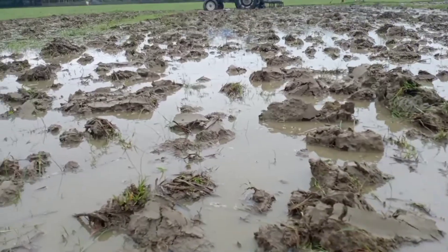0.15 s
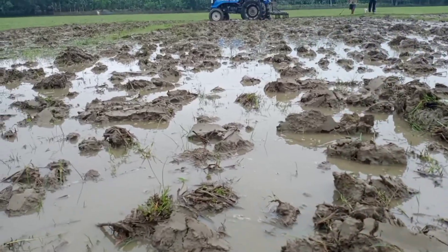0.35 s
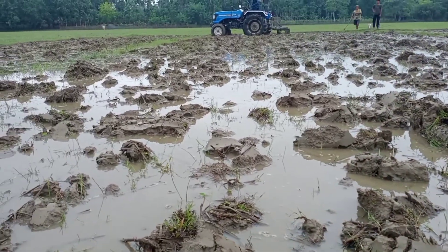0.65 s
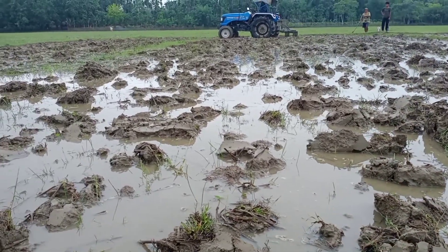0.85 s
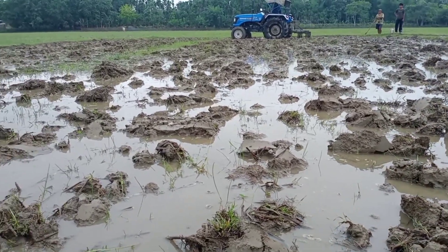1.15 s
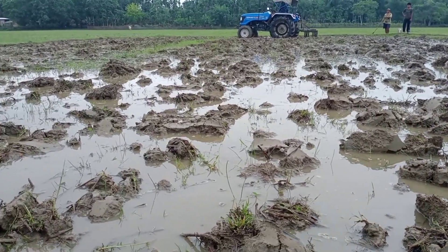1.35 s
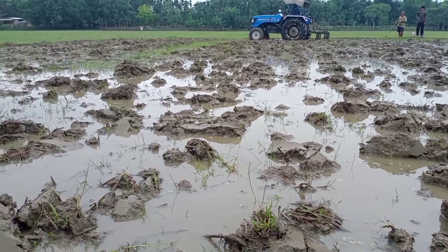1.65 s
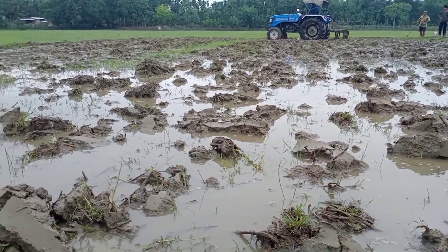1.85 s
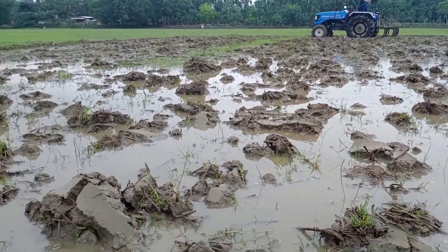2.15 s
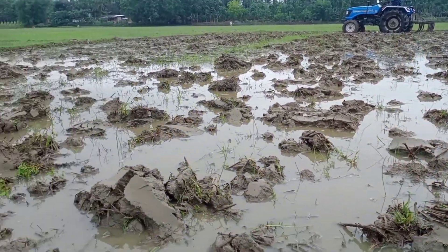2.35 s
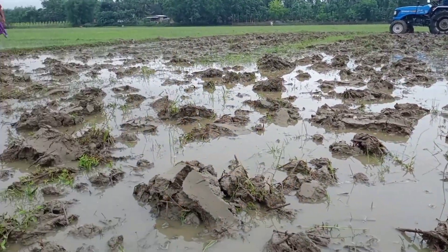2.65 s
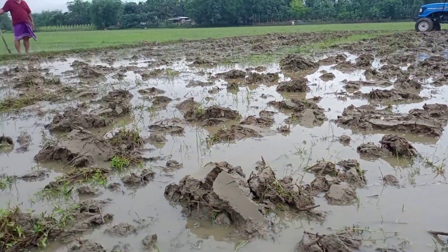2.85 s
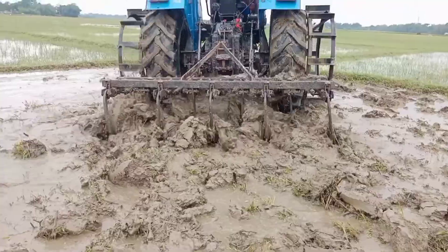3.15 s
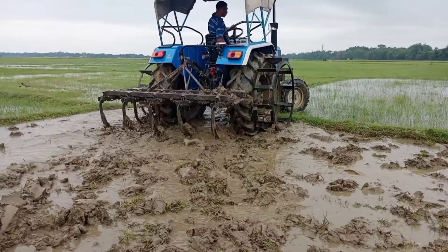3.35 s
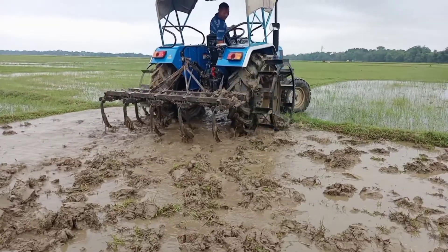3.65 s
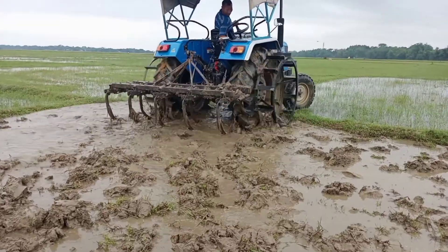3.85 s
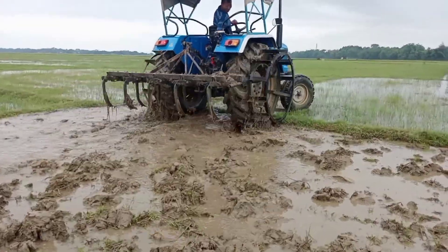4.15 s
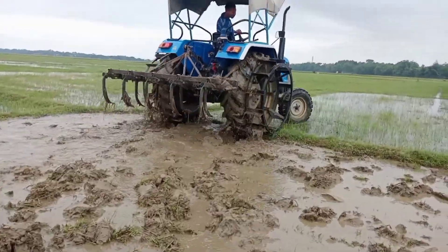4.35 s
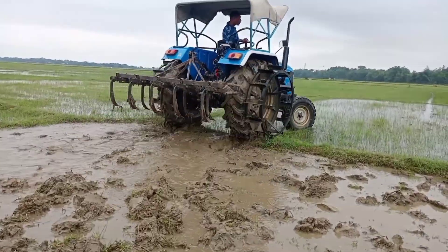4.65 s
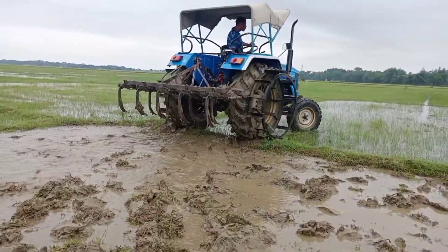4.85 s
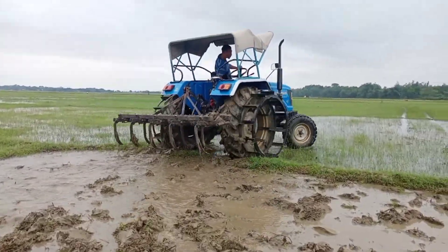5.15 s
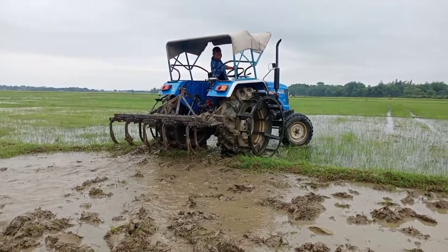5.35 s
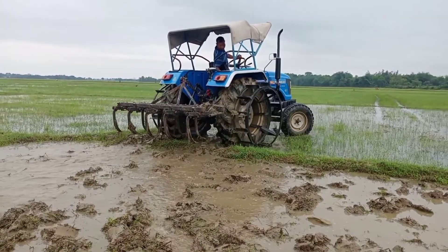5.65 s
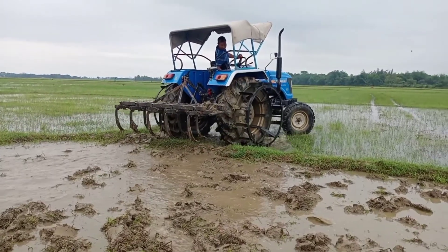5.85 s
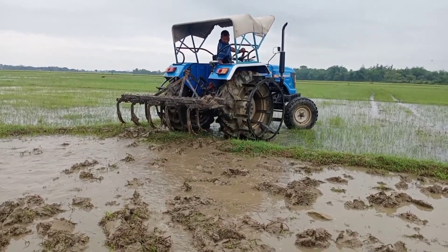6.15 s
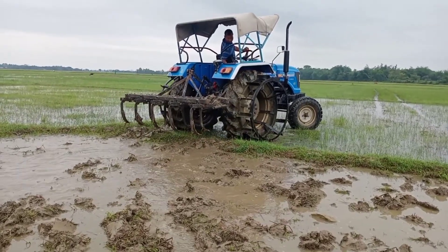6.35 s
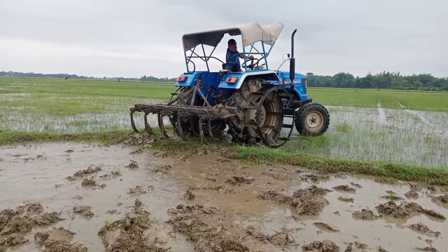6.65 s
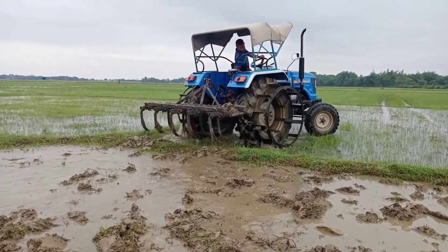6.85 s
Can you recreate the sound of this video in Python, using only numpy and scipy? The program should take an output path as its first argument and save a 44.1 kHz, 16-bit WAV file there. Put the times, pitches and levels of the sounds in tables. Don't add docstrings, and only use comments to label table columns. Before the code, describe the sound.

Outdoors on a flooded field, a diesel tractor putters far off with a dull, steady rattle and faint hiss. The sound stops dead for a moment, then returns a few metres away, louder and deeper. The engine labours hard, eases, and surges again at the end, with metal clanks, short water splashes and heavy wind thumping the unprotected microphone.

```python
import sys
import numpy as np
from scipy import signal
from scipy.fft import rfft, irfft
from scipy.io import wavfile
from scipy.ndimage import uniform_filter1d, map_coordinates

SR = 44100
rng = np.random.default_rng(int(sys.argv[2]) if len(sys.argv) > 2 else 0)


def generate_wav(sig):
    pcm = np.round(np.clip(np.atleast_2d(sig).T, -1, 1) * 32767).astype(np.int16)
    wavfile.write(sys.argv[1], SR, pcm)


def volts_from_db(level):
    exponent = np.asarray(level, float) / 20
    return 10 ** exponent


N = 308700
t = np.arange(N) / SR
NEAR_START_S = 3.159
far = t < NEAR_START_S


def level(x, db):
    return x * volts_from_db(db) / np.sqrt(np.mean(x ** 2))


def colour(x, table):
    hz, db = np.transpose(table)
    bins_hz = np.arange(2049) * SR / 4096 + 1
    log_gain = np.interp(np.log(bins_hz), np.log(hz), db) * np.log(10) / 20
    cepstrum = irfft(log_gain)
    cepstrum[1:2048] *= 2
    cepstrum[2049:] = 0
    response = irfft(np.exp(rfft(cepstrum)))
    return signal.fftconvolve(x, response)[:N]


def by_distance(x, far_colour, near_colour):
    split = int(NEAR_START_S * SR)
    far_part = level(colour(x, far_colour)[:split], 0)
    near_part = level(colour(x, near_colour)[split:], 0)
    return np.r_[far_part, near_part]


def walk(rate_hz):
    hold = int(SR / rate_hz)
    steps = np.repeat(rng.standard_normal(N // hold + 1), hold)
    smooth = uniform_filter1d(uniform_filter1d(steps, hold), hold)
    return level(smooth[:N], 0)


def noise():
    return rng.standard_normal(N)


# time_s, firing_rate_hz
FIRING_RATE = [(0.0, 24.35), (0.51, 28.14), (1.24, 26.62), (1.8, 26.51), (2.46, 27.01), (3.04, 26.54),
               (3.16, 27.22), (3.31, 23.57), (3.39, 28.03), (3.62, 28.03), (3.7, 25.31), (4.49, 20.82),
               (4.69, 24.0), (4.83, 25.93), (5.3, 27.26), (6.7, 27.24), (6.8, 22.4), (7.0, 21.9)]


def crankshaft():
    start_turn, jump_turn = .52, .23
    rate_hz = np.interp(t, *np.transpose(FIRING_RATE))
    return start_turn + jump_turn * ~far + np.cumsum(rate_hz) / SR


# multiple_of_firing_rate, far_db, near_loaded_db, near_idle_db
EXHAUST_HARMONICS = [(3, -2, -4, -3), (4, 0, 0, -2), (2, -13, -13, -14), (5, -8, -6, -6), (6, -3, -9, -9),
                     (7, -7, -16, -2), (8, -10, -17, -12), (9, -18, -17, -16), (12, -13, -22, -22)]


def exhaust(turns, load):
    out, lag = 0, np.where(far, .09, .012)
    for order, far_db, loaded_db, idle_db in EXHAUST_HARMONICS:
        db = np.where(far, far_db, idle_db + load * (loaded_db - idle_db))
        waver_db, waver_rad = 1.2 * walk(6), .15 * walk(8)
        phase = 2 * np.pi * (order * turns - lag * order ** 2) + waver_rad
        out = out + volts_from_db(db + waver_db) * np.sin(phase)
    return out


def combustion(turns, peak_s, width_s, tail_db):
    cycle = turns.astype(int)
    since_s = t - np.interp(cycle, turns, t)
    size = volts_from_db(1.2 * rng.standard_normal(cycle[-1] + 1))[cycle]
    burst = np.exp(-((since_s - peak_s) / width_s) ** 2)
    tail = volts_from_db(tail_db) * (1 - np.exp(-(since_s / peak_s) ** 2)) * np.exp(-since_s / 0.037)
    grain = volts_from_db(1.5 * walk(400))
    return size * (burst + tail) * grain * noise()


# frequency_hz, density_db_per_hz
FAR_KNOCK_COLOUR = [(120, -37), (200, -9.5), (409, 1), (465, -18), (558, -3), (836, -36), (1100, -27),
                    (2090, -13.5), (2330, -18), (4040, -12.5), (5520, -29), (8580, -13), (16000, -43)]
NEAR_KNOCK_COLOUR = [(120, -42), (200, -10), (328, -20), (548, 1.5), (696, -12.5), (806, -31.5), (1060, -2),
                     (1320, -36), (1500, -7), (1870, -28), (2050, -13), (2910, -14), (6280, -23.5),
                     (8900, -12.5), (16000, -40.5)]


def knock(turns):
    peak_s = width_s = np.where(far, .003, .006)
    blows = combustion(turns, peak_s, width_s, np.where(far, -1.5, -7))
    return by_distance(blows, FAR_KNOCK_COLOUR, NEAR_KNOCK_COLOUR)


# frequency_hz, density_db_per_hz
FAR_WASH_COLOUR = [(18, -60), (40, -30), (93, -12), (134, -12), (170, -10), (245, -13), (415, -9),
                   (461, -17), (844, -16), (1540, -25), (2350, -27), (4080, -32), (5590, -50), (8740, -33),
                   (16000, -58)]
NEAR_WASH_COLOUR = [(18, -38), (30, -22), (93, 1.5), (184, -5), (295, -11.5), (437, -14.5), (684, -11),
                    (822, -29.5), (913, -13), (1160, -15), (1860, -22), (3580, -26), (5450, -34),
                    (8740, -26.5), (16000, -58)]


def wash():
    churn = volts_from_db(0.41 * walk(12) + 1.2 * walk(60)) * noise()
    return by_distance(churn, FAR_WASH_COLOUR, NEAR_WASH_COLOUR)


def modes(turns, table, scatter_db, peak_s, tail_db):
    out, cycle = 0, turns.astype(int)
    blow = np.roll(np.diff(cycle, prepend=cycle[0]), int(peak_s * SR))
    strikes = level(blow, -1) + level(combustion(turns, peak_s, .004, tail_db), 0)
    for hz, width_hz, db in table:
        struck = strikes * volts_from_db(db + scatter_db * rng.standard_normal(cycle[-1] + 1))[cycle]
        resonator = signal.iirpeak(hz, hz / width_hz, SR)
        out = out + rng.choice([-1, 1]) * signal.lfilter(*resonator, struck) / np.sqrt(width_hz)
    return level(out, 0)


# frequency_hz, width_hz, level_db
FAR_PANELS = [(872, 21, -0.5), (980, 66, 3.5), (1456, 25, 2.5), (1760, 51, -2.5), (2342, 35, 2),
              (2390, 90, -7), (3000, 76, -17), (3793, 34, -7.5), (4070, 50, -5.5)]
NEAR_PANELS = [(980, 90, 0), (1170, 110, -1), (1430, 80, -5), (1750, 40, -5), (2310, 70, -11)]
# frequency_hz, width_hz, level_db
CASTING_MODES = [(560, 60, 3), (680, 60, -2), (1100, 80, 3), (2300, 200, -5), (2900, 200, -4),
                 (3600, 250, -6), (4200, 300, -8)]


def ringing(turns, load, ring_db, knock_db, wash_db):
    far_ring = modes(turns, FAR_PANELS, 1.2, .003, 2)
    near_ring = modes(turns, NEAR_PANELS, 1.5, .005, -8)
    clang = modes(turns, CASTING_MODES, 3.5, .006, -4)
    near = volts_from_db(wash_db - 10) * near_ring + load * volts_from_db(knock_db - 2) * clang
    return np.where(far, volts_from_db(ring_db) * far_ring, near)


def intake(turns, hz):
    slow = [uniform_filter1d(uniform_filter1d(noise(), size=18), size=18) for _ in range(2)]
    angle = 2 * np.pi * np.cumsum(hz) / SR
    throb = 1 + 1.6 * np.exp(-(turns % 1) / .4)
    return level(throb * (slow[0] * np.cos(angle) + slow[1] * np.sin(angle)), 0)


# time_s, lag_ms
WATER_LAG = [(0, 0.13), (1, 0.14), (1.8, 0.13), (2.5, 0.15), (3, 0.12)]


def over_water(x, share=0.16):
    lag_s = np.interp(t, *np.transpose(WATER_LAG)) / 1000
    reflected = map_coordinates(x, [(t - lag_s) * SR], order=3, mode="nearest")
    return x + share * far * reflected


# time_s, load_fraction
FUEL = [(0, 0.37), (2, 0.15), (3, 0.02), (3.16, 0.76), (3.35, 0.38), (3.4, 0.34), (3.79, 0.37),
        (3.82, 0.94), (4.65, .95), (4.82, 1.05), (4.9, 0.64), (4.97, 0), (5.6, 0.1), (6.5, 0.12),
        (6.74, 0.2), (6.79, 1.1), (7, 1.18)]
# time_s, panel_ring_db, intake_hz, intake_db
BEARING = [(0, -41, 8630, -52), (.8, -39, 8740, -46), (1.2, -39, 8750, -65), (1.7, -40, 8800, -46),
           (2.2, -42.5, 8800, -45.5), (2.7, -42, 9840, -51.5), (3, -39, 9900, -48.5)]
# far_db, near_idle_db, full_load_rise_db
BOOM, KNOCK, WASH = (-34, -24, 4.7), (-45, -42, 22.2), (-33.5, -22, 2.37)


def tractor():
    turns = crankshaft()
    fuel = np.interp(t, *np.transpose(FUEL))
    load = np.clip((fuel - .45) / .4, 0, 1)
    away_db = -0.64 * (t - NEAR_START_S)
    boom_db, knock_db, wash_db = (np.where(far, far_db, near_db + away_db) + rise_db * fuel
                                  for far_db, near_db, rise_db in (BOOM, KNOCK, WASH))
    time_s, *columns = np.transpose(BEARING)
    ring_db, intake_hz, intake_db = (np.interp(t, time_s, column) for column in columns)
    boom = volts_from_db(boom_db) * exhaust(turns, load)
    knocks = volts_from_db(knock_db) * knock(turns)
    churn = volts_from_db(wash_db) * wash()
    ring = ringing(turns, load, ring_db, knock_db, wash_db)
    hiss = far * volts_from_db(intake_db) * intake(turns, intake_hz)
    return over_water(boom + knocks + churn + ring + hiss)


def grain_bursts(grains, events):
    out, since_s = np.zeros(N), np.arange(SR // 5) / SR
    for s, db, t60, hz, sharpness in events:
        start = int(s * SR)
        envelope = (1 - np.exp(-since_s / 0.0021)) * np.exp(-np.log(1000) * since_s / t60)
        burst = grains[start:start + len(since_s)] * envelope
        band = signal.iirpeak(hz, sharpness, SR)
        burst = signal.lfilter(*band, signal.lfilter(*band, burst))
        out[start:start + len(since_s)] += volts_from_db(db) * burst / np.abs(burst).max()
    return signal.sosfilt(signal.butter(2, 12000, fs=SR, output="sos"), out)


# start_s, peak_db, centre_hz
SPRAY = [(.657, -36, 10000), (3.185, -22, 14000), (3.262, -26, 13500), (3.305, -20, 13500),
         (3.345, -22, 13000), (3.518, -16.5, 10100), (5.027, -21, 10300), (5.138, -10.5, 8400),
         (5.153, -30, 12000), (5.568, -26, 12000), (6.0, -24, 11000), (6.485, -23, 10000),
         (6.507, -19, 10800)]


def spray(grains):
    decay_s, sharpness = 0.039, 2
    return grain_bursts(grains, [(s, db, decay_s, hz, sharpness) for s, db, hz in SPRAY])


# start_s, length_s, rise_fraction, top_db
GUSTS = [(1.847, 0.65, 0.33, -28), (2.76, 0.26, .55, -24.5), (3.207, 0.13, .3, -9.5),
         (3.627, 0.19, 0.63, -10.5), (3.786, 0.23, 0.29, -18), (4.85, 0.19, .3, -13.5),
         (5.223, 0.36, 0.11, -14), (5.557, .4, 0.54, -12.5), (5.965, .33, 0.15, -10.5),
         (6.38, 0.256, .3, -19), (6.707, 0.17, .5, -11), (6.84, 0.15, .6, -15)]
# frequency_hz, density_db_per_hz
WIND_COLOUR = [(18, -27), (30, -12.5), (75, 2), (173, -2.5), (485, -9.5), (805, -27.5), (980, -29),
               (1500, -28.5), (1950, -35), (3300, -120)]
# centre_s, peak_db, pitch_hz
PUFFS = [(1.88, -18.5, 158), (2.005, -14.5, 138), (2.105, -15, 160), (2.876, -20, 204), (3.275, -4, 174),
         (3.677, -8.5, 215), (3.72, -4.5, 246), (3.753, -0.5, 194), (3.889, -1, 225), (3.98, -6, 160),
         (4.967, -4, 204), (5.247, -5.5, 168), (5.312, -7, 208), (5.438, -3.5, 327), (5.454, -5.5, 162),
         (5.662, -1, 158), (5.722, -6, 172), (5.744, -5.5, 330), (5.764, -4, 203), (5.816, -8, 225),
         (5.869, 4, 184), (5.924, -3.5, 185), (6.003, 0.5, 232), (6.026, -3, 151), (6.052, -8.5, 193),
         (6.136, 5, 245), (6.171, -4.5, 180), (6.747, -5.5, 173), (6.818, -3, 234), (6.992, -3, 180)]


def wind():
    strength, edge_db = 0, -7.5
    for start, length, rise, top_db in GUSTS:
        s = start + length * np.array([0, rise, 1])
        db = top_db + edge_db * np.array([1, 0, 1])
        edge = np.interp(t, [s[0], s[0] + 0.025, s[-1] - .03, s[-1]], [0, 1, 1, 0])
        strength = strength + edge * volts_from_db(np.interp(t, s, db) - 6)
    turbulence = level(colour(volts_from_db(2.5 * walk(70)) * noise(), WIND_COLOUR), 0)
    out = np.r_[strength * turbulence, np.zeros(SR)]

    eddies_per_s, eddy_db, scatter_db, eddy_hz = 32, 6.5, 1, 180
    chance = rng.standard_normal((int(7 * eddies_per_s), 3))
    when_s = np.clip((np.arange(len(chance)) + .3 * chance[:, 0]) / eddies_per_s, .1, 6.98)
    gust_db = 20 * np.log10(strength[(when_s * SR).astype(int)] + 1e-6)
    eddies = zip(when_s, gust_db + eddy_db + scatter_db * chance[:, 1], eddy_hz * np.exp(.15 * chance[:, 2]))
    puffs = [*PUFFS, *eddies]
    around = np.arange(-800, 800)
    for (s, db, hz), turn in zip(puffs, rng.random(len(puffs))):
        swings = hz * around / SR
        angle = 2 * np.pi * (swings + turn)
        shape = np.sin(angle) + .25 * np.sin(2 * angle) + .08 * np.sin(3 * angle)
        out[int(s * SR) + around] += volts_from_db(db) * np.exp(-(swings / 0.47) ** 2) * shape
    return out[:N]


# start_s, peak_db, decay_s, centre_hz, sharpness
CLANKS = [
    (3.27, -12, .15, 900, .8),
    (3.305, -16, 0.19, 2480, 0.71),
    (4.923, -20.5, .11, 4500, .71),
    (5.138, -10.5, 0.031, 2140, 1.7),
    (5.153, -19.5, 0.034, 3180, 2.9),
    (5.376, -16.5, .02, 2600, 1.5),
    (6.483, -16, 0.023, 2420, 2.5),
    (6.639, -20.5, .02, 3700, 4.5),
    (6.659, -17, 0.025, 3000, 1.5),
    (3.718, -13, .03, 740, 1.5),
]


def clanks(grains):
    return grain_bursts(grains, CLANKS)


def scene():
    grains = volts_from_db(2.0 * walk(500)) * noise()
    return (tractor() + spray(grains) + wind() + clanks(grains))[None]


# frequency_hz, gain_db
MICROPHONE_COLOUR = [(100, 0.5), (4300, -1), (5000, -3), (6400, -5.5), (7600, -5), (10500, -1),
                     (12500, -4.5), (14000, 3.5), (15400, 10.5)]


def microphone(x):
    top = signal.ellip(12, .2, 80, 15500, fs=SR, output="sos")
    heard = signal.sosfilt(top, colour(x, MICROPHONE_COLOUR))
    return signal.sosfilt(signal.butter(3, 48, "high", fs=SR, output="sos"), heard)


def band_limit(x):
    return signal.sosfilt(signal.butter(12, 16210, fs=SR, output="sos"), x)


def record(dry):
    cut_s, fade_s = 3.0005, .09
    heard = microphone(dry[0])
    fade_in = np.clip((t - NEAR_START_S) / fade_s, 0, 1) ** 1.6
    fade = np.where(t < cut_s, 1, fade_in)
    mix = np.tanh(0.57 * heard[None] * fade) / 0.63
    return band_limit(mix)


dry = scene()
out = record(dry)
generate_wav(out)
```